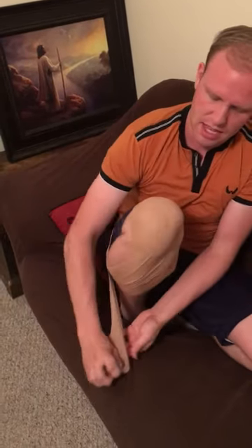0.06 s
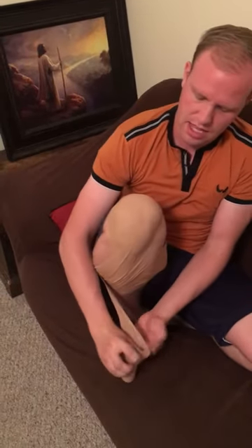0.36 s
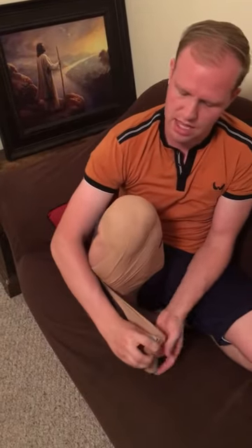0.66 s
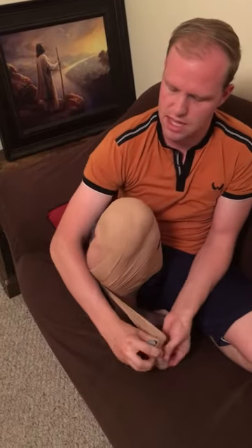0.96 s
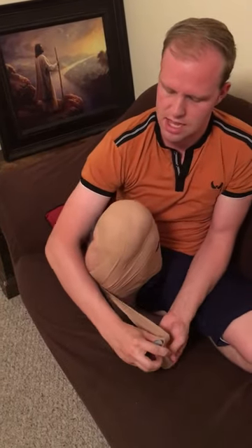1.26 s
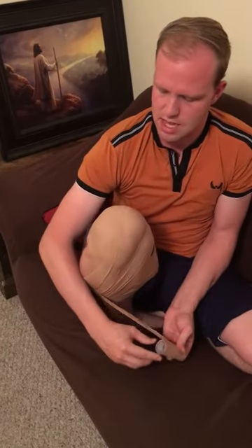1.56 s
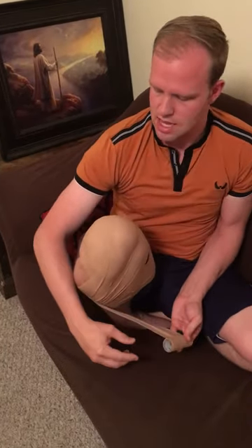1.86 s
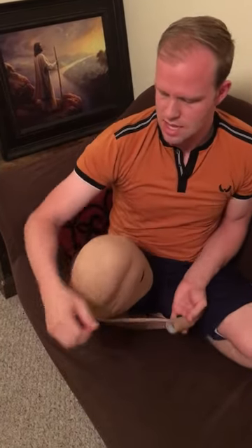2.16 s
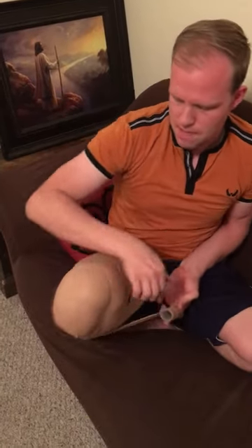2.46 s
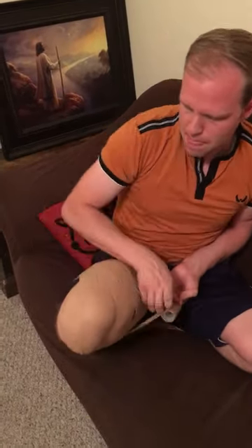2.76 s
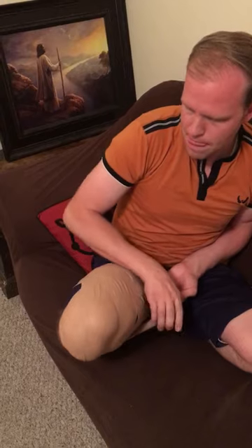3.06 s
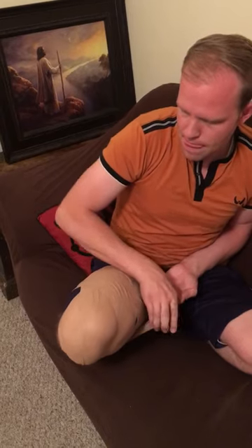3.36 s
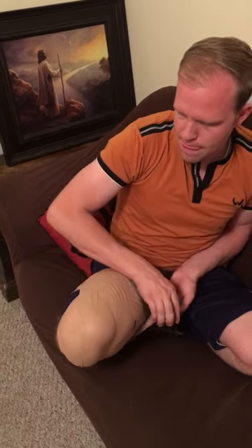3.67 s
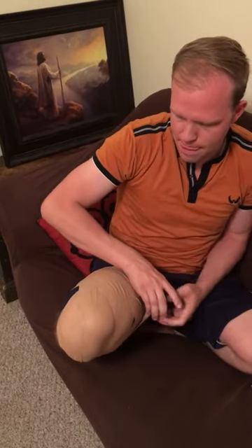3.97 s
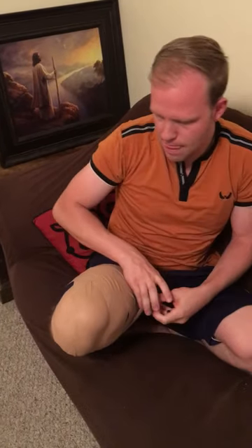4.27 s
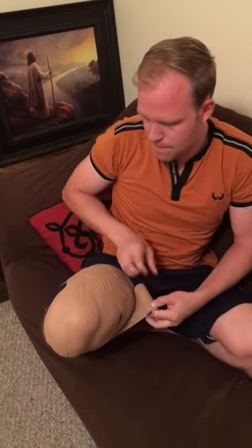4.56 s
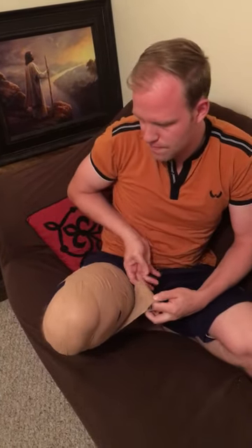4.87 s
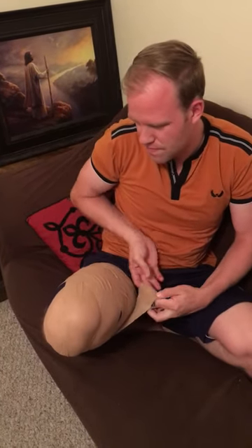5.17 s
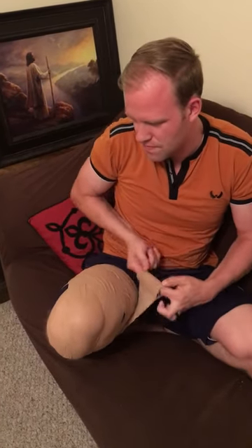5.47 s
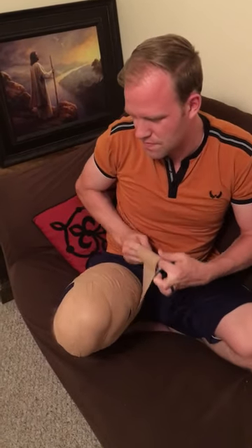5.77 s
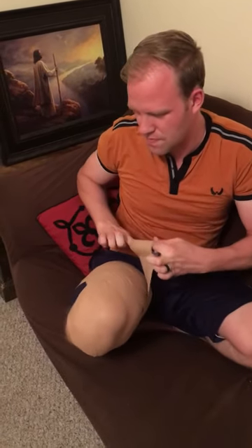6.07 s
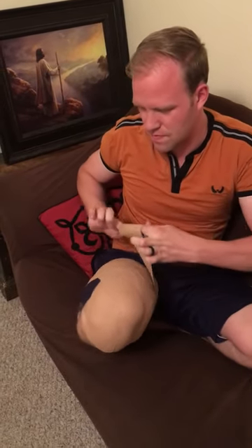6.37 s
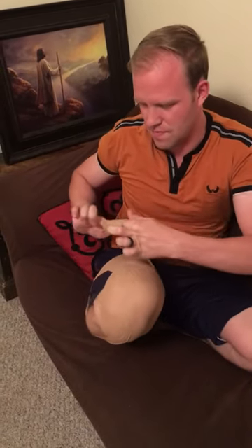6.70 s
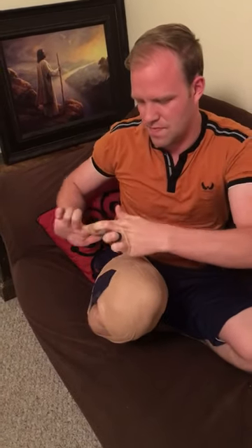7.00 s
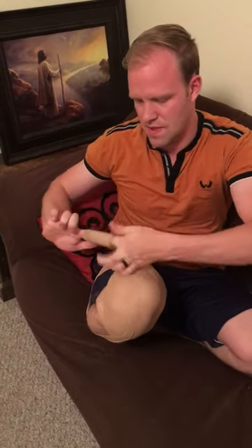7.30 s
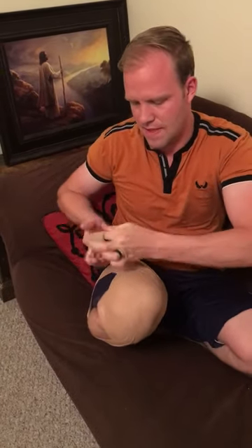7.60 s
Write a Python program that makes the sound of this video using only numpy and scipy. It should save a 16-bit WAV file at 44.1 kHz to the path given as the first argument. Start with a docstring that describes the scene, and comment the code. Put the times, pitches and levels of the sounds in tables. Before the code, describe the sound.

A self-adhesive elastic bandage is handled close by in a small living room. At first there is only faint rustling of skin and fabric, low cushion creaks, soft bumps and scattered sticky clicks. After about five seconds the bandage peels away from its roll in dense, crackling bursts, each tug thumping the stretched strip lightly, and the crackle thins out near the end.

```python
"""Bandaging a knee.

Someone on a couch in a small living room winds a self-adhesive elastic bandage round a knee.
Hands and cloth rub, cushions creak, dull knocks sound, fingers pick at the tacky roll. From about 5 s
the bandage is pulled off the roll: sticky fibres let go in crackling showers, and every jerk thumps
the taut strip like a soft drum skin."""
import sys
import numpy as np
from scipy import signal
from scipy.fft import rfft, irfft
from scipy.io import wavfile
from scipy.ndimage import uniform_filter1d

SR = 44100
rng = np.random.default_rng(int(sys.argv[2]) if len(sys.argv) > 2 else 0)


def int16_out(signal):
    """Quantize to a 16-bit WAV file."""
    q = np.round(np.clip(np.atleast_2d(signal).T, -1, 1) * 32767)
    wavfile.write(sys.argv[1], SR, q.astype(np.int16))


N = 341334
TIME = np.arange(N) / SR


def from_db(db):
    """Decibels to gain."""
    return 10 ** (np.asarray(db) / 20)


def unit_rms(x):
    """Scale to rms 1."""
    return x / np.sqrt(np.mean(x ** 2) + 1e-20)


def at_hz(points, hz):
    """Read a table on a log-frequency axis."""
    freqs, values = np.transpose(points)
    return np.interp(np.log(hz + 1e-9), np.log(freqs), values)


def butter(x, order, hz, kind):
    """Butterworth filter."""
    return signal.sosfilt(signal.butter(order, hz, kind, fs=SR, output="sos"), x + 1e-18)


def colour(x, spectrum, size=4096):
    """Minimum-phase filter of the given spectral shape; keeps the power of white input."""
    gain = unit_rms(from_db(at_hz(spectrum, np.arange(size // 2 + 1) * SR / size)))
    cepstrum = irfft(np.log(gain))
    cepstrum[1:size // 2] *= 2
    cepstrum[size // 2 + 1:] = 0
    return signal.fftconvolve(x, irfft(np.exp(rfft(cepstrum))))[:N]


def pole_pair(hz, radius):
    """Denominator of a two-pole filter."""
    return [1, -2 * radius * np.cos(2 * np.pi * hz / SR), radius * radius]


def resonance(x, hz, t60_s):
    """Band-pass resonance, peak gain 1."""
    radius = 1000 ** (-1 / (t60_s * SR))
    return signal.lfilter(np.array([1, 0, -1]) * (1 - radius ** 2) / 2, pole_pair(hz, radius), x + 1e-18)


def struck(start_s, hz, t60_s):
    """Decaying sine of initial amplitude 1."""
    age = np.arange(SR // 4) / SR
    out, at = np.zeros(N + len(age)), round(start_s * SR)
    out[at:at + len(age)] = np.sin(2 * np.pi * hz * age) * 1000 ** (-age / t60_s)
    return out[:N]


def envelope(start_s, length_s, attack_s, release_s):
    """Linear attack centred on start_s, hold, exponential release."""
    attack = np.clip((TIME - start_s) / attack_s + .5, 0, 1)
    return attack * np.exp(-np.clip((TIME - start_s - length_s) / release_s, 0, 20))


def gestures(rows, attack_s, release_s):
    """Movement envelopes summed in power; one gain curve per level column."""
    power = 0
    for start_s, length_s, *levels_db in rows:
        power += (from_db(levels_db)[:, None] * envelope(start_s, length_s, attack_s, release_s)) ** 2
    return np.sqrt(power)


def drift(rate_hz, hop=40, settle=2000):
    """Slow random curve of rms 1."""
    radius = np.exp(-2 * np.pi * rate_hz * hop / SR)
    noise = rng.standard_normal(N // hop + settle + 2)
    slow = signal.lfilter([1], pole_pair(0, radius), noise)[settle:]
    return np.interp(np.arange(N) / hop, np.arange(len(slow)), unit_rms(slow))


def grains(per_s, spread_db, clump_db, clump_hz, even_s):
    """Clumped random clicks of uneven size, levelled to a power of about 1 over even_s."""
    sizes = from_db(spread_db * np.clip(rng.standard_normal(N), -2, 2) + clump_db * drift(clump_hz))
    clicks = (rng.random(N) < per_s / SR) * sizes * rng.choice([-1, 1], N)
    width = int(even_s * SR)
    power = uniform_filter1d(uniform_filter1d(clicks ** 2, width), width)
    return clicks / np.sqrt(np.maximum(power, 0) + 1e-6)


def ticks(per_s, level_db):
    """Lone clicks of uneven size."""
    hits = rng.random(N) < per_s / SR
    return hits * from_db(level_db + 2.3 * np.clip(rng.standard_normal(N), -2, 2))


def showers(rows, per_s, fade_s, build_s, shower_db, size=2048):
    """Short bursts of snaps that build and fade around one timed snap; one train per level column."""
    trains, lead = np.zeros((len(shower_db), N + size)), size // 8
    age = (np.arange(size) - lead) / SR
    swell = np.exp(np.minimum(age / build_s, -(age / fade_s) ** 2))
    for time_s, *levels_db in rows:
        hits = rng.random(size) < per_s / SR
        strength = rng.standard_normal((len(trains), size)) * from_db(shower_db)[:, None]
        shower = hits * strength * swell
        shower[:, lead] = 1  # timed snap
        shower /= np.linalg.norm(shower, axis=1, keepdims=True)
        at = round(time_s * SR) - lead
        trains[:, at:at + size] += from_db(levels_db)[:, None] * shower
    return trains[:, :N]


# Background noise spectrum: (frequency [Hz], relative density [dB])
BACKGROUND_SPECTRUM = [(18, -55), (30, -4.5), (59, 5.5), (102, -5.5), (152, 1), (213, -6.5), (270, -3),
                       (691, -20), (1510, -21.5), (3980, -28.5), (4910, -30), (8720, -31), (15500, -37)]


def background(level_db=-60.5):
    """Quiet, steady, bass-heavy noise."""
    return from_db(level_db) * colour(rng.standard_normal(N), BACKGROUND_SPECTRUM)


def electrical_ticking(period_s=0.05002):
    """The microphone's electronics tick faintly and evenly in the treble."""
    clicks = np.zeros(N)
    clicks[(np.arange(0.0003, TIME[-1], period_s) * SR).astype(int)] = from_db(-45)
    return butter(clicks, 2, [6000, 12000], "band")


# Cloth rustle, weave scrape and nap hiss spectra: (frequency [Hz], relative density [dB])
RUSTLE_SPECTRUM = [(300, 0), (700, -0.5), (1350, 3.5), (2100, -2), (3200, -9.5), (6000, -34)]
SCRAPE_SPECTRUM = [(1200, -21), (2400, -5), (3000, -9), (3900, -5), (5000, -11), (6000, -9), (9000, -32)]
HISS_SPECTRUM = [(2500, -19), (5000, -7.5), (6500, 1), (9300, 4.5), (10400, -2.5), (11500, 3),
                 (15500, -6.5)]
# Hand and cloth strokes: (time [s], length [s], rustle gain [dB], scrape gain [dB], hiss gain [dB])
HAND_STROKES = [(0.0, 0.14, -57.5, -62, -66.5), (0.13, 0.063, -53.5, -62, -66),
                (0.22, 0.22, -63.5, -71, -75), (0.38, 0.18, -68.5, -64, -71.5),
                (0.655, 0.012, -62, -67, -65.5), (0.84, 0.087, -81, -74, -70),
                (1.03, 0.11, -73, -75, -69.5), (1.255, 0.31, -66.5, -63, -72.5),
                (1.56, 0.13, -68, -62.5, -65.5), (1.7, 0.49, -68, -67, -72.5),
                (2.275, 0.012, -68, -57.5, -56), (2.42, 0.43, -69, -80.5, -80),
                (2.64, 0.052, -73, -68, -71.5), (2.825, 0.012, -63, -74, -73),
                (2.92, 0.55, -73.5, -93, -95), (3.515, 0.014, -58, -68, -58.5),
                (3.78, 0.2, -65, -75.5, -77), (3.98, 0.21, -67, -69, -71.5),
                (4.34, 0.11, -65.5, -72.5, -67), (4.87, 0.089, -64.5, -71, -65.5),
                (7.438, 0.012, -54, -69, -70), (7.505, 0.019, -57, -62, -58)]


def rubbing():
    """Skin and cloth slide over the weave in dense, tiny catches; single threads tick."""
    rustle, scrape, hiss = gestures(HAND_STROKES, attack_s=0.057, release_s=0.025) * from_db(1.2 * drift(6))
    catches = grains(per_s=3000, spread_db=4.5, clump_db=5, clump_hz=23, even_s=0.021)
    threads = grains(per_s=7000, spread_db=7, clump_db=3.5, clump_hz=8.7, even_s=0.3)
    threads += ticks(per_s=28, level_db=22)
    nap = grains(per_s=6000, spread_db=7, clump_db=3, clump_hz=45, even_s=0.03)
    return (from_db(1) * colour(rustle * catches, RUSTLE_SPECTRUM)
            + from_db(-1) * colour(scrape * threads, SCRAPE_SPECTRUM)
            + from_db(0.5) * colour(hiss * nap, HISS_SPECTRUM))


# Couch rumble and creak spectra: (frequency [Hz], relative density [dB])
RUMBLE_SPECTRUM = [(25, -12), (42, 2), (85, 6.5), (130, -10.5), (250, -10.5), (600, -51)]
CREAK_SPECTRUM = [(70, -43.5), (150, -5.5), (330, 0.5), (480, -10), (650, -10), (850, -21.5), (1500, -24),
                  (4000, -94)]
# Weight shifts on the cushions: (time [s], length [s], rumble gain [dB], creak gain [dB])
WEIGHT_SHIFTS = [(0.015, 0.24, -43, -54), (0.5, 0.084, -60, -58), (1.56, 0.65, -57, -62.5),
                 (1.94, 0.19, -54, -52), (2.08, 0.37, -65, -60.5), (2.45, 0.34, -59, -63),
                 (3.435, 0.0067, -53.5, -53), (3.86, 0.23, -58.5, -55.5), (4.21, 0.034, -50.5, -60.5),
                 (4.43, 0.014, -82, -57.5), (4.9, 0.039, -55.5, -62.5), (5.22, 0.09, -51, -49.5),
                 (6.5, 0.51, -53, -50), (7.36, 0.015, -46.5, -51)]


def couch():
    """Shifting weight makes a low rumble and muffled creaks of small slips."""
    rumble, creak = gestures(WEIGHT_SHIFTS, attack_s=0.022, release_s=0.053)
    catches = grains(per_s=250, spread_db=1.5, clump_db=3.5, clump_hz=10, even_s=0.098)
    jolts = grains(per_s=600, spread_db=3, clump_db=0.5, clump_hz=14, even_s=0.1)
    low = from_db(-1.5) * rumble * colour(jolts, RUMBLE_SPECTRUM)
    return low + colour(creak * catches, CREAK_SPECTRUM)


# Handling knocks: (time [s], gain [dB], pitch [Hz])
HANDLING_BUMPS = [(0.191, -28, 302), (0.566, -32, 297), (1.672, -35, 307), (1.974, -38, 366),
                  (2.023, -34, 371), (2.244, -33, 400), (2.434, -42, 650), (2.48, -41, 523),
                  (2.51, -40, 845), (2.549, -43, 700), (2.577, -35.5, 420), (2.645, -46, 606),
                  (2.747, -36.5, 605), (3.018, -38, 563), (3.259, -40, 600), (3.341, -41.5, 600),
                  (3.397, -39, 517), (3.425, -39, 810), (3.448, -36, 560), (3.519, -54, 476),
                  (3.91, -35, 370), (3.943, -28.5, 326), (3.978, -27, 318), (4.017, -26, 410),
                  (4.206, -24, 256)]


def bumps(t60_s=0.0077):
    """Soft, dull, dry handling knocks close to the microphone."""
    knocks = sum(from_db(db - 3.5) * struck(time_s + 0.00208, hz, t60_s)
                 for time_s, db, hz in HANDLING_BUMPS)
    return butter(knocks, 2, [200, 1100], "band")


def twangs(snaps, low_hz=650, high_hz=4800, t60_cycles=8.7, power_share=0.6, count=16):
    """Each snap rings one fibre cluster at its own pitch; total power stays about the same."""
    cluster = rng.integers(0, count, N)
    rings = sum((-1) ** k * resonance(snaps * (cluster == k), hz, t60_cycles / hz)
                for k, hz in enumerate(np.geomspace(low_hz, high_hz, count)))
    makeup = 2 * t60_cycles * np.log(high_hz / low_hz) / np.log(1000)
    return np.sqrt(1 - power_share) * snaps + np.sqrt(power_share * makeup) * rings


def disperse(x, hz):
    """Waves cross limp cloth at different speeds: an all-pass delays the band around hz."""
    poles = pole_pair(hz, np.exp(-np.pi * hz / SR))
    return signal.lfilter(poles[::-1], poles, x + 1e-18)


# Fibre fizz, weave crack and strip thump spectra: (frequency [Hz], relative density [dB])
FIZZ_SPECTRUM = [(1500, -39), (3600, -8), (4900, 0.5), (6500, 4), (7500, 0.5), (9000, 4.5), (10400, -3.5),
                 (11500, 1), (15500, -13)]
CRACK_SPECTRUM = [(250, -15), (500, -1), (870, 0), (1300, -1), (1900, -6), (2350, -4), (2750, -12),
                  (3600, -11), (5000, -29), (9000, -74.5)]
THUMP_SPECTRUM = [(40, -34), (70, -19), (105, -5.5), (150, -6), (210, 2.5), (270, 7), (400, -18.5),
                  (800, -40.5)]


def bandage(crack, thump, fizz):
    """A snap sounds through the fine fibres, then the weave, and last swings the whole strip."""
    weave = disperse(colour(twangs(crack), CRACK_SPECTRUM), hz=1470)
    return colour(fizz, FIZZ_SPECTRUM) + weave + colour(thump, THUMP_SPECTRUM)


# Strip resonance, sinking overall as more comes free: (time [s], pitch [Hz])
STRIP_PITCH = [(5.3, 367), (5.45, 395), (5.6, 389), (5.75, 330), (6.2, 310), (6.9, 295), (7.2, 320),
               (7.74, 303)]


def taut_strip(x, width_hz, block=256):
    """Lowest resonance of the free strip, gliding with its length."""
    out, state = np.zeros(N), np.zeros(2)
    radius = np.exp(-np.pi * width_hz / SR)
    for i in range(0, N, block):
        poles = pole_pair(np.interp(i / SR, *np.transpose(STRIP_PITCH)), radius)
        out[i:i + block], state = signal.lfilter([1, 0, -1], poles, x[i:i + block] + 1e-18, zi=state)
    return butter(out, 2, 600, "low") * np.sqrt((1 - radius ** 2) / 2)


# Picks at the roll: (time [s], crack gain [dB], fizz gain [dB], weave gain [dB])
ROLL_PICKS = [(0.332, -46.5, -67, -67), (0.53, -43, -64, -77), (0.562, -46.5, -64, -71),
              (1.341, -52, -61, -57), (1.426, -57, -71, -61), (1.558, -56, -60, -64),
              (1.632, -51, -61, -68), (2.245, -46, -61, -67), (2.385, -50.5, -65.5, -65),
              (2.918, -48.5, -56, -80), (3.423, -49, -71, -77), (3.448, -51, -66, -67),
              (3.517, -43.5, -55.5, -75), (4.153, -61, -60.5, -71), (4.301, -56, -59.5, -82),
              (4.35, -51, -57, -62), (4.437, -50.5, -69, -73), (4.899, -52, -74, -76),
              (4.946, -47, -61, -65), (7.319, -51, -50.5, -59.5), (7.339, -44, -53, -61.5)]


def picks():
    """Fingertips stick to the tacky roll and snap free; the thump follows the crack's level."""
    rows = [(time_s, db, db, fizz_db, weave_db) for time_s, db, fizz_db, weave_db in ROLL_PICKS]
    crack, thump, fizz, weave = showers(rows, per_s=2100, fade_s=0.01, build_s=0.0025,
                                        shower_db=[11, -14, 19, 15])
    snap = bandage(from_db(18) * crack, from_db(14) * thump, from_db(25.5) * fizz)
    scrape = from_db(27) * colour(weave, SCRAPE_SPECTRUM)
    return snap + scrape + from_db(-1) * taut_strip(thump, width_hz=54)


# Bright click spectrum: (frequency [Hz], relative density [dB])
CLICK_SPECTRUM = [(1500, -31), (3800, -3), (7000, -4), (9800, 2.5), (13000, -9), (15500, -1)]
# Two-part smack: (time [s], click gain [dB], cutoff [Hz], ring [Hz], ring gain [dB], ring t60 [s])
SMACK_PARTS = [(3.711, -30.5, 17000, 2310, -39.5, 0.053), (3.7245, -37.5, 11500, 946, -37.5, 0.049)]


def smack():
    """Two brief clicks, the second duller, each with a short hollow ring that lingers."""
    clicks, rings = np.zeros(N), np.zeros(N)
    for time_s, click_db, cutoff_hz, ring_hz, ring_db, t60_s in SMACK_PARTS:
        window = np.exp(-((TIME - time_s - 0.001) / 0.0033) ** 2)
        burst = butter(window * rng.standard_normal(N), 4, cutoff_hz, "low")
        clicks += from_db(click_db - 10) * colour(burst, CLICK_SPECTRUM)
        clicks += from_db(ring_db - 10) * colour(burst, CRACK_SPECTRUM)
        ring_noise = unit_rms(resonance(rng.standard_normal(N), ring_hz, t60_s / 2))
        linger = from_db(-15) * envelope(time_s + 0.018, 0, attack_s=0.015, release_s=0.042) * ring_noise
        rings += from_db(ring_db) * (struck(time_s + 0.00251, ring_hz, t60_s) + linger)
    return room(clicks, wet_db=-6, modes_db=-2) + rings


# Modes rung by the flick: (frequency [Hz], relative level [dB], t60 [s])
FLICK_RINGS = [(202, -24, 0.032), (443, -4, 0.056), (940, -1.5, 0.024), (1570, 4, 0.0087), (3030, 7, .006),
               (4300, -3.5, .005), (6300, 2.5, 0.0036), (9050, -5, 0.0022), (12600, -3, .003)]


def flick(time_s=4.7485):
    """Fingers come off the roll: one sharp snap into damped modes, then a brief crackle of fibres."""
    modes = sum((-1) ** k * from_db(db - 37) * struck(time_s, hz, t60_s)
                for k, (hz, db, t60_s) in enumerate(FLICK_RINGS))
    crack, thump, fizz = rng.standard_normal((3, N))
    fibres = bandage(crack, from_db(-14) * thump, from_db(-8) * fizz)
    fade = from_db(-43.5) * envelope(time_s, 0, attack_s=0.001, release_s=0.017)
    return room(modes + fade * fibres, wet_db=-9.5, modes_db=-6)


# Hard edge of a big snap: (frequency [Hz], relative density [dB])
EDGE_SPECTRUM = [(900, -30.5), (1700, 2.5), (2800, -3.5), (3500, 2), (4500, 2), (5300, -6.5), (9000, -4.5)]
# Big adhesive patches: (time [s], crack gain [dB], thump gain [dB], fizz gain [dB], ring gain [dB])
PATCH_RIPS = [(5.04, -40, -51, -53.5, -50), (5.056, -31.5, -45, -54, -41), (5.071, -41, -51, -48.5, -62),
              (5.158, -40.5, -49, -50, -65), (5.252, -36, -45.5, -51, -48), (5.267, -33.5, -45, -46, -36),
              (5.275, -44, -37, -55, -55), (5.311, -32.5, -41, -49, -35.5), (5.327, -45, -53, -55, -50),
              (5.342, -37, -50, -54, -46), (5.36, -30, -51, -46, -39), (5.374, -22, -58, -44, -45),
              (5.398, -27.5, -31, -39.5, -27), (5.428, -22, -54, -40, -31), (5.436, -25, -59, -43, -34),
              (5.442, -25, -45, -40, -41), (5.455, -23, -57, -41, -32), (5.465, -32, -39, -50, -29),
              (5.481, -26, -38, -37, -30), (5.508, -18.5, -48, -37.5, -29.5), (5.53, -28, -42, -40, -26.5),
              (5.5505, -22, -40, -40, -40), (5.575, -26.5, -32, -42, -50), (5.595, -25, -44, -35.5, -32),
              (5.604, -23, -35, -36.5, -23.5), (5.61, -20.5, -30, -45, -45),
              (5.652, -20, -25.5, -38.5, -30), (5.678, -22.5, -39, -36.5, -25),
              (5.72, -24.5, -29, -39, -37), (5.778, -27.5, -48, -40.5, -41), (5.813, -25, -27, -45, -27.5),
              (5.86, -30.5, -38, -55, -37), (5.897, -40, -36, -43, -49), (5.931, -23, -27.5, -37.5, -32),
              (5.967, -30, -36, -42, -39), (6.043, -32.5, -52, -41.5, -35), (6.056, -24, -30.5, -42, -24.5),
              (6.0913, -25.5, -44, -39, -33), (6.103, -37, -47, -47, -31), (6.134, -25.5, -41, -39.5, -32),
              (6.174, -21, -28, -40.5, -45), (6.2125, -21.5, -54, -42.5, -39), (6.229, -35, -55, -59, -28),
              (6.266, -27, -26, -46, -42), (6.291, -32, -50, -42, -33), (6.298, -20, -29, -41, -44),
              (6.31, -25, -34, -42, -26.5), (6.344, -24.5, -34.5, -43, -35), (6.386, -27, -44, -44, -41),
              (6.396, -31, -50, -44, -46), (6.411, -27, -46, -42, -42), (6.478, -27, -29.5, -39.5, -45),
              (6.551, -28, -42, -50.5, -49), (6.558, -22.5, -38, -39.5, -36), (6.578, -41, -45, -56, -46),
              (6.609, -27, -46, -41, -39), (6.662, -27, -43, -35.5, -49), (6.678, -23, -51, -41, -56),
              (6.702, -28.5, -50, -53, -47), (6.723, -36, -55, -57.5, -39),
              (6.738, -22.5, -27.5, -39, -24.5), (6.77, -24, -31, -44, -29.5),
              (6.823, -27.5, -42, -46.5, -31), (6.873, -29, -51, -45.5, -39), (6.936, -26, -29.5, -45, -45),
              (6.947, -24, -37, -52, -43), (6.959, -25, -48, -58, -49), (7.002, -28, -32, -45.5, -32.5),
              (7.118, -32.5, -40, -47, -45), (7.155, -29, -50, -59, -28.5), (7.401, -34.5, -47, -67, -55),
              (7.433, -36.5, -45, -64, -37), (7.497, -38, -48, -54, -49), (7.523, -34, -40, -61, -35.5),
              (7.638, -30.5, -59, -55, -54.5), (7.667, -36, -56, -49, -57), (7.703, -29.5, -48, -47, -60),
              (7.712, -32.5, -51, -61, -54)]


def rips(pull):
    """Whole patches tear loose in a jerk: a hard-edged burst of snaps and a tug on the strip."""
    crack, thump, fizz, ring = showers([*PATCH_RIPS, *slips(pull)], per_s=3600, fade_s=0.0062,
                                       build_s=0.0018, shower_db=[-3, -19, 12, -17.5])
    edge = from_db(4.5) * disperse(colour(crack, EDGE_SPECTRUM), hz=2800)
    tear = bandage(from_db(14) * crack, from_db(21) * thump, from_db(20.5) * fizz)
    return tear + edge + from_db(19.5) * taut_strip(ring, width_hz=45)


def sticking(dip_db, before_s, length_s):
    """Gain dip as the adhesive holds just before each big patch tears."""
    jerks = np.zeros(N)
    jerks[[round((time_s - before_s) * SR) for time_s, *_ in PATCH_RIPS]] = 1
    held = signal.oaconvolve(jerks, np.hanning(int(length_s * SR)), "same")
    return from_db(dip_db * np.clip(held, 0, 1))


def thump_gain(short_strip_hz=374, db_per_octave=26.5):
    """A longer, lower strip thumps more strongly."""
    strip_hz = np.interp(TIME, *np.transpose(STRIP_PITCH))
    return from_db(db_per_octave * np.log2(short_strip_hz / strip_hz))


def slips(pull, per_s=38, jitter_beats=0.29):
    """Small patches catch and give way unevenly during a pull; rows as in PATCH_RIPS."""
    start_s, end_s = BANDAGE_PULLS[0][0], TIME[-1]
    beats_s = np.arange(start_s, end_s, 1 / per_s)
    late, size, weight = rng.standard_normal((len(beats_s), 3)).T
    times_s = np.clip(beats_s + jitter_beats * late / per_s, start_s, end_s)
    at = (times_s * SR).astype(int)
    free = pull * sticking(dip_db=-5, before_s=0.01, length_s=0.03)
    crack = free[at] * from_db(12 + 0.5 * np.clip(size, -2, 2)) + 1e-9
    thump = crack * from_db(-21 + 2.5 * weight) * thump_gain()[at]
    fizz, ring = crack * from_db(-25), crack * from_db(-18)
    return np.column_stack([times_s, *20 * np.log10([crack, thump, fizz, ring])])


# Pulls on the bandage: (time [s], length [s], crackle gain [dB], drop by the end [dB])
BANDAGE_PULLS = [(5.049, 0.2, -60, 1.5), (5.238, 0.19, -59, -6), (5.369, 0.38, -41.5, 1.5),
                 (5.707, 0.3, -44.5, 4.5), (6.053, 0.15, -47, -3), (6.207, .18, -42.5, -3),
                 (6.417, 0.23, -49, 7.5), (6.578, 0.2, -44.5, -2), (6.815, 0.18, -48.5, -3),
                 (6.931, 0.095, -40.5, 8), (7.134, 0.069, -49.5, 5.5), (7.403, 0.28, -60.5, -6.5),
                 (7.63, 0.12, -48.5, 1)]


def pulling():
    """Peel strength: each pull takes hold quickly, slackens or tightens, and lets go."""
    pull = np.zeros(N)
    for start_s, length_s, db, drop_db in BANDAGE_PULLS:
        progress = np.clip((TIME - start_s) / length_s, 0, 1)
        grip = envelope(start_s, length_s, attack_s=0.0038, release_s=0.028)
        pull = np.maximum(pull, grip * from_db(db - drop_db * progress))
    return pull


def peeling(pull, firm_pull_db=-35):
    """Fibres let go along the peel line and pluck the strip: sparse when slow, crowded when fast."""
    crack = pull * sticking(dip_db=-3.5, before_s=0.008, length_s=0.02)
    thump = from_db(-11) * crack * thump_gain()
    fizz = from_db(-42.5) * (crack / from_db(firm_pull_db)) ** 0.92  # grows more slowly than the crack
    speed = np.sqrt(crack / crack.max())
    snaps = grains(per_s=120 + 750 * speed, spread_db=2, clump_db=3.5, clump_hz=29, even_s=0.017)
    fine = grains(per_s=600 + 3000 * speed, spread_db=4, clump_db=4, clump_hz=190, even_s=0.08)
    crackle = bandage(from_db(1) * crack * snaps, thump * snaps, fizz * fine)
    stiff_fibres = colour(fizz * ticks(per_s=70, level_db=11), CLICK_SPECTRUM)
    return crackle + stiff_fibres + taut_strip(from_db(3.5) * crack * snaps, width_hz=127)


# Diffuse room decay: (frequency [Hz], t60 [s])
ROOM_DECAY = [(500, 0.8), (2000, 0.56), (6000, 0.59), (14000, 0.073)]


def reflections(bands=7):
    """One diffuse room response of unit energy; the treble dies first."""
    age, tail = np.arange(SR // 2) / SR, 0
    edges_hz = np.geomspace(400, 16000, bands + 1)
    for low_hz, high_hz in zip(edges_hz, edges_hz[1:]):
        band = butter(rng.standard_normal(len(age)), 2, [low_hz, high_hz], "band")
        tail += band * 1000 ** (-age / at_hz(ROOM_DECAY, np.sqrt(low_hz * high_hz)))
    tail *= (age > 0.003) * (1 + 1.28 * np.exp(-age / 0.016))  # body, couch and wall answer first
    return tail / np.linalg.norm(tail)


# Room standing waves: (frequency [Hz], relative gain [dB], t60 [s])
STANDING_WAVES = [(157.2, 13, 0.61), (203.7, 2.5, 0.14), (227.7, 3, 0.37), (325.7, 9, 0.2),
                  (373.4, 5.5, 0.25), (444, 5, 0.53), (694, -5, 0.37), (881, 1.5, 0.035), (1215, 6, 0.18),
                  (1370, -12, 0.28)]


def room(x, wet_db, modes_db, patterns=7, patterns_per_s=13):
    """Direct sound, standing waves, and reflection patterns that crossfade as the hands move."""
    place, diffuse = TIME * patterns_per_s, 0
    for k in range(patterns):
        distance = np.abs((place - k + patterns / 2) % patterns - patterns / 2)
        crossfade = np.sqrt(np.maximum(1 - distance, 0))
        diffuse += signal.oaconvolve(x * crossfade, reflections())[:N]
    standing = sum(from_db(db) * resonance(x, hz, t60_s) for hz, db, t60_s in STANDING_WAVES)
    return from_db(-2) * (x + from_db(wet_db) * diffuse + from_db(modes_db) * standing)


def scene():
    """Hands, bandage and couch over the quiet background; mono."""
    pull = pulling()
    hands = peeling(pull) + picks() + rubbing() + rips(pull)
    floor = background() + electrical_ticking()
    return (room(hands, wet_db=-6, modes_db=-3) + smack() + flick() + couch() + bumps() + floor)[None]


def record(dry, low_hz=36, high_hz=15900):
    """The small microphone loses the lowest bass; the top is cut steeply."""
    thin = butter(dry, 6, low_hz, "high")
    return signal.sosfilt(signal.ellip(10, 0.1, 70, high_hz, fs=SR, output="sos"), thin)


dry = scene()
out = record(dry)
int16_out(out)
```